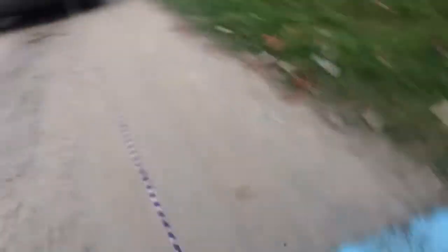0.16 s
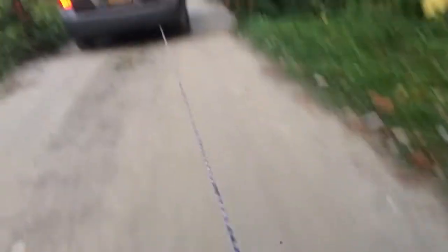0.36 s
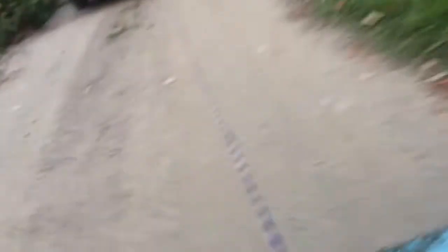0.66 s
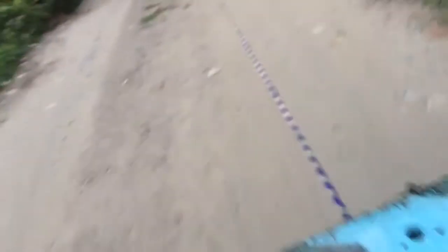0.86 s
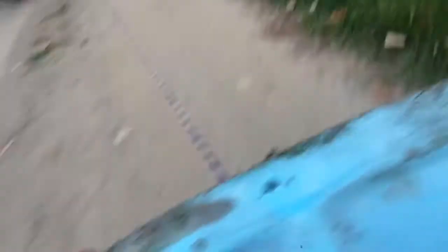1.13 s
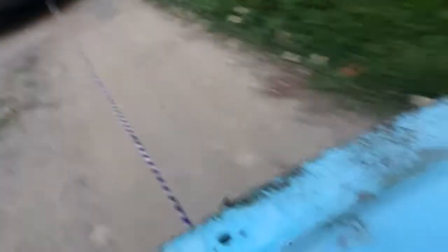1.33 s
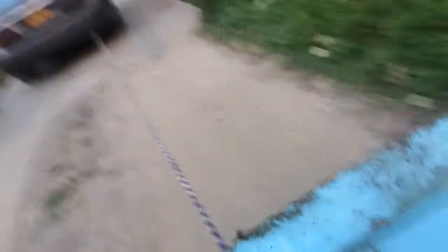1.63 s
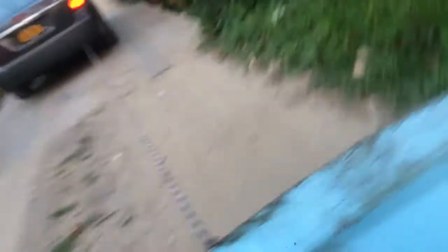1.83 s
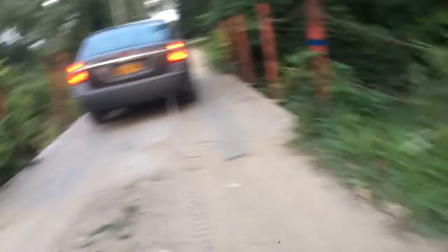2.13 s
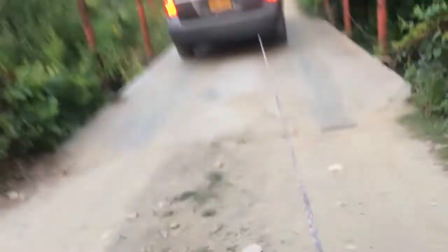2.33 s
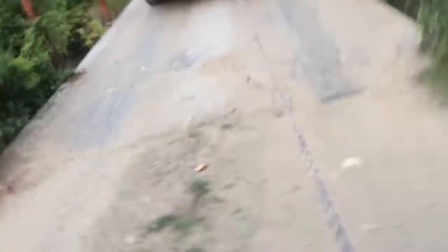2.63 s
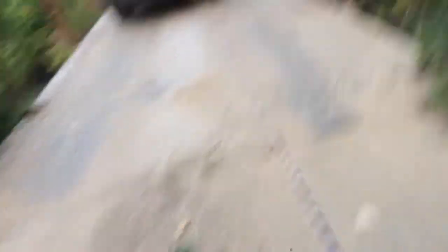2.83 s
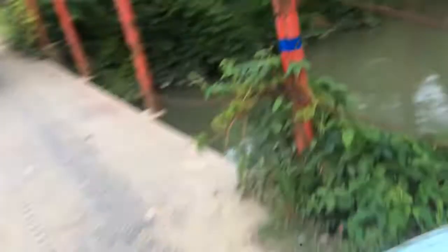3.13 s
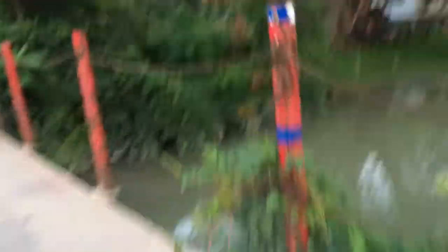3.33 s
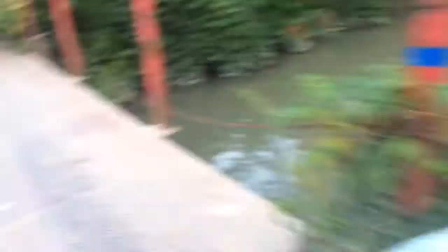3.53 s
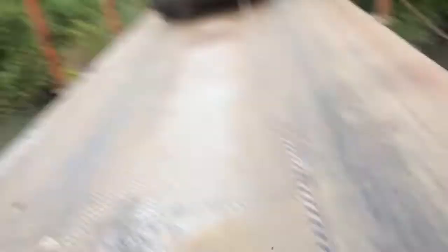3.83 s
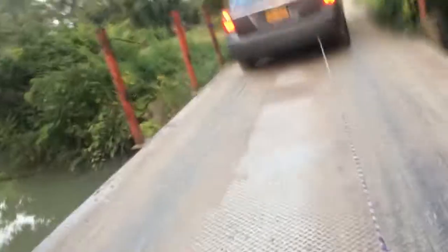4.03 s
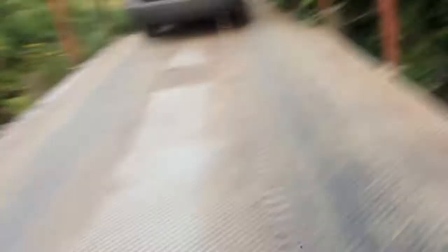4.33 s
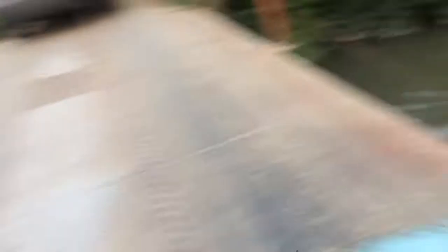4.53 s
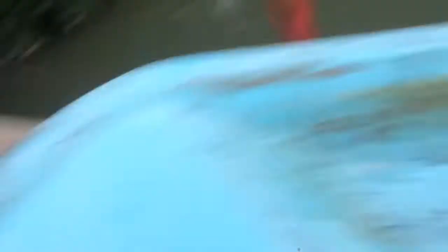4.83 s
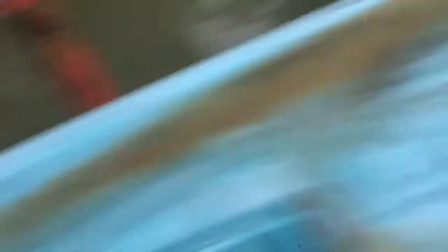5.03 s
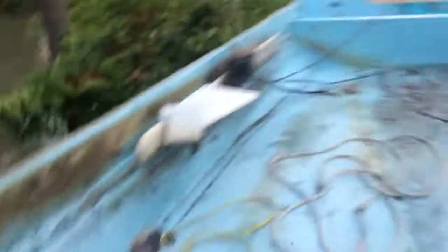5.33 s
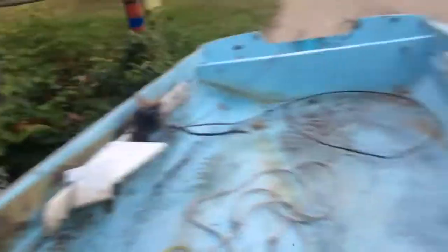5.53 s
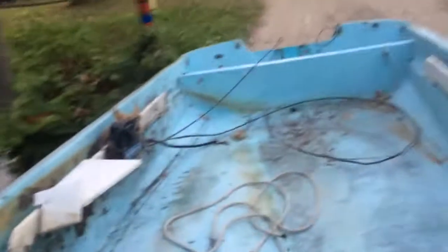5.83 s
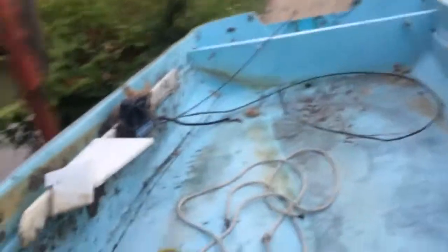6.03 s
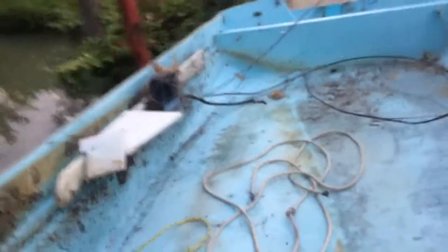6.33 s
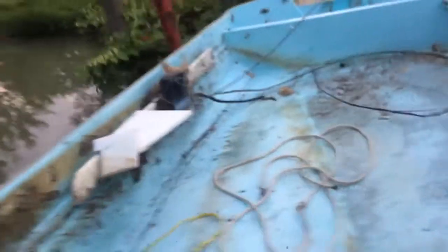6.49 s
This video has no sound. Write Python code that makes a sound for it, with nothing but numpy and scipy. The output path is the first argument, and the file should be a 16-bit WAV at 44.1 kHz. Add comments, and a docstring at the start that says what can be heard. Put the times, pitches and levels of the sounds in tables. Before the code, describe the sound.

Heard from on board, a fibreglass boat is dragged over a dirt road. The hollow hull drums and thuds at low pitch over bumps, while gravel grinds in short uneven strokes and a loose fitting rattles now and then. As it moves onto a steel-decked bridge outdoors, the scraping becomes harsher and brighter, with hard stone knocks, clattering taps and brief squeaks, then eases at the end. The microphone is close, inside the hull.

```python
"""A dirt road and then a steel-decked bridge, heard from on board a fibreglass boat towed on a rope.
Random contacts ring the bottom panel, hull and shell modes; bumps add sine thuds and drumming.
The keel digs in by strokes and skips over ridges, filtered grains hiss as grit, and a loose fitting rattles in runs.
On the deck the scrape turns harsher, with brief squeaks, and the bottom panel drones more."""
import sys
import numpy as np
from scipy import signal
from scipy.fft import rfft, irfft, next_fast_len
from scipy.io import wavfile
from scipy.ndimage import uniform_filter1d, minimum_filter1d, map_coordinates

SR = 44100
rng = np.random.default_rng(int(sys.argv[2]) if len(sys.argv) > 2 else 0)


def digitize_waveform(pressure):
    """Quantize a signal to 16-bit integers and store it at the path in sys.argv[1].

    Rows of a 2-D input are taken as channels; values are limited to [-1, 1].
    """
    field = np.atleast_2d(pressure).T
    bounded = np.clip(field, -1, 1)
    quanta = np.round(bounded * 32767).astype(np.int16)
    wavfile.write(sys.argv[1], SR, quanta)


N = 293703
TIME = np.arange(N) / SR


def from_db(db):
    """Amplitude gain of a level in dB."""
    return 10 ** (np.asarray(db) / 20)


def rms_one(x):
    """Scale to an RMS of 1."""
    return x / np.sqrt(np.mean(x ** 2) + 1e-20)


def in_time(rows):
    """Each dB column of a curve as a gain per sample."""
    s, *columns = np.transpose(rows)
    return [from_db(np.interp(TIME, s, db)) for db in columns]


def drift(rate_per_s):
    """Smooth chance with spread 1."""
    knots = rng.standard_normal(4000)
    return rms_one(map_coordinates(knots, [TIME * rate_per_s], order=1, mode="wrap"))


def bandpass(x, order, low_hz, high_hz):
    """Butterworth band."""
    return signal.sosfilt(signal.butter(order, [low_hz, high_hz], "band", fs=SR, output="sos"), x)


def colour(x, spectrum, skirt_db_per_octave=48):
    """Shape a signal by a spectrum whose ends fall away steeply."""
    hz, db = np.transpose(spectrum)
    size = next_fast_len(N + 8192)
    octave = np.log2(np.arange(size // 2 + 1) * SR / size + 1)  # +1 Hz avoids log of zero
    points = np.log2(hz)
    beyond = np.abs(octave - np.clip(octave, points[0], points[-1]))
    gain = from_db(np.interp(octave, points, db) - skirt_db_per_octave * beyond)
    return irfft(rfft(x, size) * gain, size)[:N]


def resonate(x, hz, width_hz):
    """A two-pole resonance with gain 1 on top."""
    radius = np.exp(-np.pi * width_hz / SR)
    zeros = np.array([1, 0, -1]) * (1 - radius ** 2) / 2
    poles = [1, -2 * radius * np.cos(2 * np.pi * hz / SR), radius ** 2]
    return signal.lfilter(zeros, poles, x + 1e-18)


def even(x, span_s):
    """Hold the slow level at 1 and keep the fast flutter."""
    size = max(int(span_s * SR), 8)
    power = uniform_filter1d(uniform_filter1d(x * x, size), size)
    return x / np.sqrt(np.abs(power) + 1e-14)


def grains(per_s, spread_db, clump_db, clumps_per_s):
    """Random contacts of uneven size that come in clumps."""
    sizes = from_db(spread_db * np.minimum(rng.exponential(1, N), 4)) * rng.choice([-1, 1], N)
    hits = rng.random(N) < per_s / SR
    return sizes * hits * from_db(clump_db * drift(clumps_per_s))


def add(out, s, sound):
    """Mix a short sound in at time s."""
    start = max(int(s * SR), 0)
    out[start:start + len(sound)] += sound[:max(N - start, 0)]


def bursts(times, levels_db, t60_s):
    """An envelope that jumps at each event and dies away by 60 dB in t60_s."""
    out = np.zeros(N)
    for s, db in zip(times, levels_db):
        add(out, s, from_db(db - 60 * TIME[:SR // 4] / t60_s))
    return out


def swell(s, half_s):
    """A Gaussian hump of height 1 at time s, down to 1/e after half_s."""
    return np.exp(-np.minimum(((TIME - s) / half_s) ** 2, 50))


# Passage onto the bridge. Each row: time in seconds, share of the keel on the deck 0-1.
DECK_SHARE = [(0, 0.21), (2.9, 0.15), (3.3, 0.48), (4.0, 0.24), (4.5, .55), (4.95, 0.83), (6.66, 0.94)]


def on_deck():
    """Share of the keel that rests on steel, per sample."""
    return np.clip(np.interp(TIME, *np.transpose(DECK_SHARE)), 0, 1)


# Skips over ridges. Each row: centre in seconds, change of gain in dB.
SKIPS = [(0.03, -3), (0.23, -2), (0.75, 0.5), (0.894, -3), (1.16, -3), (1.45, -1), (1.84, -1.5),
         (2.35, -0.5), (3.12, -5), (3.215, -3.5), (4.03, -1.5), (4.29, -7.5), (4.59, -2.5), (4.79, -0.5),
         (5.76, -2.5), (5.915, -0.5), (6.6, -2)]
SKIP_HALF_S = 0.041


def grounded():
    """Ground contact gain: nearly every skip dips it as the hull loses contact."""
    return from_db(sum(db * swell(s, SKIP_HALF_S) for s, db in SKIPS))


# Weight on the bottom panel. Each row: time in seconds, drone level in dB.
WEIGHT = [(0.0, -26), (1.93, -28), (2.21, -29), (4.84, -30), (4.95, -26.5), (6.19, -24.5), (6.34, -22.5),
          (6.66, -28)]
# Boat rocking down onto its bottom. Each row: centre in seconds, drone level in relative dB.
ROCKS = [(0.17, -19.5), (0.588, -18.5), (0.83, -20.5), (1.07, -25), (2.28, -21), (2.821, -21), (3.3, -20),
         (3.71, -20), (4.162, -20), (5.16, -18.5), (5.27, -24), (5.47, -18), (5.59, -15.5), (5.8, -22.5),
         (5.999, -16.5), (6.2, -14.5), (6.399, -21)]
# Heave spectrum. Each row: frequency in Hz, gain in dB.
HEAVE_SPECTRUM = [(18, -22.5), (28, -16.5), (42, 4.5), (60, 2), (80, 12), (110, -31)]
ROCK_HALF_S = 0.04
BOTTOM_HZ, BOTTOM_WIDTH_HZ, BOTTOM_SKIRT_HZ = 103, 10.8, 89


def bottom(deck, rock_db=-0.5, heave_db=-7.5, steel_heave_db=-0.5, heave_follows=0.9, uneven_db=3.15):
    """The wide bottom panel resonates under the weight, more at each rock; low heave noise follows its level."""
    steady = in_time(WEIGHT)[0] * from_db(uneven_db * drift(7.4))
    rocking = sum(from_db(db + rock_db) * swell(s, ROCK_HALF_S) for s, db in ROCKS)
    drone = np.hypot(steady, rocking)
    followed = drone.mean() * (drone / drone.mean()) ** heave_follows
    heave = followed * from_db(heave_db + steel_heave_db * deck)
    panel = resonate(grains(900, 3.9, 0.67, 9.3), BOTTOM_HZ, BOTTOM_WIDTH_HZ)
    panel = resonate(panel, BOTTOM_HZ, BOTTOM_SKIRT_HZ)
    sway = colour(rng.standard_normal(N), HEAVE_SPECTRUM)
    return drone * even(panel, 0.09) + heave * even(sway, 0.051)


# Steady shaking between bumps. Each row: time in seconds, level in relative dB.
SHAKE = [(0.0, -14.5), (0.52, -15), (1.22, -13.5), (1.35, -24), (1.61, -14.5), (1.76, -17), (2.5, -13.5),
         (3.1, -18), (3.99, -14.5), (4.38, -16.5), (5.08, -24.5), (5.25, -27.5), (5.99, -25), (6.21, -24.5),
         (6.44, -29.5), (6.66, -27)]
DRUM_RISE_S = 0.019  # drumming peaks this long after a bump
# The bearing point picks the pitch that booms most; it sinks along the road and wanders.
BEARING_HZ, BEARING_SAG_HZ_PER_S, WANDER_OCTAVES, WANDERS_PER_S = 207.5, 2, 0.091, 14


def shaking(steady_db=0.5, uneven_db=0.07, uneven_per_s=20):
    """Level and pitch of the drumming: each bump raises it and pulls it towards its own pitch."""
    power = (in_time(SHAKE)[0] * from_db(steady_db + uneven_db * drift(uneven_per_s))) ** 2
    bearing_hz = (BEARING_HZ - BEARING_SAG_HZ_PER_S * TIME) * 2 ** (WANDER_OCTAVES * drift(WANDERS_PER_S))
    weighted_hz = power * bearing_hz
    age = TIME[:SR // 3] / DRUM_RISE_S
    for s, _, hz, drum_db in BUMPS:
        surge = (from_db(drum_db) * age * np.exp(1 - age)) ** 2
        add(power, s, surge)
        add(weighted_hz, s, surge * hz)
    return np.sqrt(power) * grounded(), weighted_hz / power


def thud(hz, rise_s=0.0011, fall_s=0.013):
    """One soft blow on the hull: a decaying sine, peak 1."""
    t = TIME[:SR // 6]
    swing = np.sin(2 * np.pi * hz * t) * (1 - np.exp(-t / rise_s)) * np.exp(-t / fall_s)
    return swing / np.abs(swing).max()


# Hull modes. Each row: frequency in Hz, width in Hz, gain on dirt in dB, gain on the deck in dB.
HULL_MODES = [(135.7, 18, 0, -4), (165, 21.4, -3.5, -4.5), (199.3, 21.2, -6, -9), (238, 27, -9, -11.5),
              (263.6, 23, -1, -14), (312.7, 19, -12, -14.5)]
# Bumps. Each row: time in seconds, thud in relative dB, pitch in Hz, drumming after it in dB.
BUMPS = [(0.109, -17, 172, -11), (0.199, -7.5, 179, -8.5), (0.351, -22, 185, -7.5), (0.521, -3, 186, -24),
         (0.645, 8.5, 264, -19), (0.81, -9, 195, -9), (0.93, -19, 217, -10), (1.053, -4, 225, -12),
         (1.188, -22, 195, -20), (1.313, -12, 227, -4.5), (1.532, 1.5, 168, -26), (1.656, 0, 201, -11.5),
         (1.777, -16, 204, -16.5), (1.884, -1, 240, -15.5), (1.929, -10, 205, -9.5),
         (2.047, -13, 163, -9.5), (2.21, -10, 175, -13.5), (2.482, -19, 173, -8), (2.649, -3, 227, -15),
         (2.792, -12, 205, -18), (2.908, 0, 125, -13), (3.248, 2.5, 169, -25), (3.311, -16, 185, -16.5),
         (3.421, -1, 200, -25), (3.528, -14, 212, -16), (3.615, -4, 164, -14), (3.951, -6, 180, -11),
         (4.098, 2, 225, -15), (4.327, 3.5, 141, -9.5), (4.511, 2, 181, -13.5), (4.63, 3, 157, -14.5),
         (4.676, 9.5, 150, -14), (4.917, 0, 165, -29), (4.996, 4, 164, -13.5), (5.161, 2, 138, -20),
         (5.617, 1.5, 195, -29), (5.645, 3, 167, -27), (5.844, 0.5, 165, -16), (6.0, -14, 160, -22.5),
         (6.081, -17, 160, -20)]


def hull(deck, focus_db=8.0, reach_octaves=0.19, bump_db=-10.5):
    """Rough ground drums on hull modes, on dirt mostly near the bearing pitch; single bumps thud on top."""
    shake, pitch_hz = shaking()
    boom = 0
    for hz, width_hz, dirt_db, deck_db in HULL_MODES:
        nearness = np.exp(-(np.log2(hz / pitch_hz) / reach_octaves) ** 2) * (1 - deck ** 4)
        gain = from_db(dirt_db + deck * (deck_db - dirt_db) + focus_db * nearness)
        boom = boom + gain * resonate(grains(900, 2.9, 2.37, 45), hz, width_hz)
    out = even(bandpass(boom, 3, 100, 330), 0.052) * shake
    for s, db, hz, _ in BUMPS:
        add(out, s, from_db(db + bump_db) * thud(hz))
    return out


# Rattle runs. Each row: start in seconds, number of taps, gap between taps in seconds,
# loudest tap counted from 0 (may fall between taps), level there in dB.
RATTLES = [(0.5541, 1, .033, 0, -35), (1.1088, 3, .0322, 0.3, -20.5), (1.256, 2, 0.054, 0, -23.5),
           (1.37, 1, .033, 0, -32), (1.4492, 2, 0.029, 0.5, -27), (1.5928, 4, 0.033, 1.1, -19.5),
           (1.7382, 3, .036, 0.3, -29), (2.2544, 1, .033, 0, -36.5), (3.1777, 1, .033, 0, -42),
           (4.795, 2, 0.033, 0.4, -25.5), (5.013, 2, 0.024, 0, -20), (5.1968, 4, 0.03, 0.5, -11),
           (5.33, 3, 0.034, 1.15, -13.5), (5.518, 2, .061, 0, -17.5), (5.6925, 1, 0.03, 0, -30),
           (5.8925, 1, .033, 0, -30), (6.1712, 1, .033, 0, -13.5), (6.534, 1, .033, 0, -32),
           (6.5929, 2, 0.04, 1, -34)]
TAP_LOSS_DB = 6  # per tap before or after the loudest


def taps():
    """The fitting bounces in short runs: (s, dB) of each tap, weaker away from the loudest."""
    return [(s + k * gap_s, db - abs(k - loudest) * TAP_LOSS_DB)
            for s, count, gap_s, loudest, db in RATTLES
            for k in range(int(round(count)))]


# Fitting modes. Each row: frequency in Hz, width in Hz, gain on dirt in dB, gain on the deck in dB.
FITTING_MODES = [(1000, 58, -14, 11), (1970, 115, -1.5, 4.5), (2770, 330, 9, -9.5), (3210, 330, 9.5, -5.5),
                 (3640, 270, 11.5, -8.5), (6070, 660, -2.5, -24), (9000, 4200, -21.5, -33)]


def fitting(deck, chatter_db=-19.0, chatter_s=0.0045, mode_spread_db=2):
    """Each tap is a sharp contact and brief chatter through resonances; on deck more body, less edge."""
    out, t = np.zeros(N), TIME[:SR // 25]
    for s, db in taps():
        chatter = rng.standard_normal(len(t)) * np.exp(-t / chatter_s)
        contact = (t == 0) + from_db(chatter_db) * chatter
        steel = deck[int(s * SR)]
        tap = 0
        for k, (hz, width_hz, dirt_db, deck_db) in enumerate(FITTING_MODES):
            strength = from_db(dirt_db + steel * (deck_db - dirt_db) + rng.normal(0, mode_spread_db))
            tap = tap + (-1) ** k * strength * resonate(contact, hz, width_hz)
        add(out, s, from_db(db) * tap / np.abs(tap).max())
    return out


def mount(knock_db=0.5, click_db=-14.0, contact_s=0.0016):
    """Each tap of the fitting also clicks on its mount and knocks through the shell, as noise bursts."""
    s, db = np.transpose(taps())
    contacts = bursts(s, db, contact_s * np.log(1000)) * rng.standard_normal(N)
    knock = bandpass(contacts, 2, 700, 2200)
    click = bandpass(contacts, 1, 2500, 8000)
    return from_db(knock_db) * knock + from_db(click_db) * click


def slips(rows, wobble, wobbles_per_s):
    """Stick-slip friction: short gliding tones with an unsteady pitch."""
    out, unsteady = np.zeros(N), drift(wobbles_per_s)
    for s, start_hz, end_hz, length_s, db in rows:
        along = np.linspace(0, 1, max(int(length_s * SR), 8))
        wander = wobble * np.roll(unsteady, -int(s * SR))[:len(along)]
        hz = (start_hz + (end_hz - start_hz) * along) * (1 + wander)
        envelope = np.sqrt(2 * np.abs(np.sin(np.pi * along)))
        add(out, s, from_db(db) * envelope * np.sin(2 * np.pi * np.cumsum(hz) / SR))
    return out


# Groans. Each row: start in seconds, start pitch in Hz, end pitch in Hz, length in seconds, level in dB.
GROANS = [(3.80, 236.6, 173, 0.17, -11.5), (6.18, 100.3, 166.6, 0.187, -14.5),
          (6.30, 107.7, 103, .17, -11.5)]


def groans():
    """The hull sticks and slips at a low pitch."""
    return slips(GROANS, wobble=0.024, wobbles_per_s=70)


# Squeaks. Each row: start in seconds, start pitch in Hz, end pitch in Hz, length in seconds, level in dB.
SQUEAKS = [(5.9335, 10300, 10400, 0.014, -19.5), (5.952, 10300, 12800, 0.018, -23),
           (5.969, 11200, 12400, 0.021, -32), (6.183, 11000, 11500, .008, -32),
           (6.206, 11100, 12400, .009, -29)]


def squeaks():
    """Grit sticks and slips on steel at a high, rough pitch."""
    return slips(SQUEAKS, wobble=0.11, wobbles_per_s=8000)


# Rasps. Each row: start in seconds, start pitch in Hz, end pitch in Hz, length in seconds, level in dB.
RASPS = [(2.204, 1330, 1394, 0.018, -24), (5.078, 1060, 1000, 0.07, -17.5), (5.10, 1500, 1480, 0.047, -16),
         (6.11, 1564, 1632, 0.094, -24.5), (6.235, 1560, 1457, 0.095, -22.5), (6.26, 900, 880, 0.027, -19),
         (6.30, 1380, 1080, 0.062, -25)]


def rasps():
    """The shell sings briefly where it rubs hard."""
    return slips(RASPS, wobble=0.1, wobbles_per_s=600)


# Keel strokes. Each row: start in seconds, length in seconds, then the levels of grinding,
# grit hiss and side panels in relative dB.
SCRAPES = [(0.078, 0.054, -37, -65, -30), (0.268, 0.14, -20.5, -50.5, -26), (0.43, 0.084, -24, -51, -18),
           (0.597, 0.076, -28.5, -68, -18), (0.777, 0.062, -20.5, -45.5, -23.5),
           (0.903, 0.22, -22, -48.5, -22), (1.169, 0.039, -20.5, -44.5, -22),
           (1.297, 0.048, -22.5, -46, -28), (1.366, 0.029, -35, -51, -28), (1.565, 0.16, -26, -55, -32),
           (1.896, 0.082, -23.5, -50.5, -29), (2.032, 0.14, -26.5, -46.5, -32),
           (2.192, 0.047, -27.5, -55, -43), (2.272, 0.03, -27.5, -68, -18), (2.434, 0.16, -26.5, -53, -21),
           (2.688, .04, -26.5, -52, -27), (2.778, .16, -27.5, -50, -26), (3.305, .13, -25.5, -50.5, -30),
           (3.677, 0.11, -34, -78, -22), (3.764, 0.25, -30, -64, -24), (4.083, 0.059, -25.5, -51, -19),
           (4.208, 0.11, -28.5, -49.5, -27.5), (4.327, 0.044, -29.5, -65, -21.5),
           (4.411, 0.09, -32, -69, -22), (4.502, 0.054, -20, -40, -28), (4.623, .07, -29, -65, -24),
           (4.91, 0.044, -21.5, -43, -25), (4.969, 0.076, -19, -41, -28), (5.074, 0.077, -17, -36.5, -22.5),
           (5.287, 0.061, -22, -44, -42), (5.436, 0.023, -24, -30, -23.5), (5.51, 0.097, -31, -59, -47),
           (5.611, 0.017, -22, -43, -23), (5.925, 0.11, -24.5, -35.5, -40), (6.054, 0.021, -30, -33, -18.5),
           (6.153, 0.065, -22, -29, -20.5), (6.229, 0.095, -17.5, -32, -27)]
DIRT_ATTACK_S, STEEL_ATTACK_S = 0.035, 0.023
SCRAPE_RELEASE_S, SCRAPE_SAG_DB_PER_S = 0.035, 19.5


def strokes(deck):
    """Each stroke bites, sags while it lasts and lets go: gains of grinding, grit and side panels."""
    out, t = np.zeros((3, N)), TIME[:SR // 2]
    for s, length_s, *levels_db in SCRAPES:
        attack_s = DIRT_ATTACK_S + deck[int(s * SR)] * (STEEL_ATTACK_S - DIRT_ATTACK_S)
        bite = np.minimum(t / attack_s, 1)
        sag = from_db(-SCRAPE_SAG_DB_PER_S * t)
        release = np.exp(-np.maximum(t - length_s, 0) / SCRAPE_RELEASE_S)
        for layer, db in zip(out, levels_db):
            add(layer, s - attack_s / 4, from_db(db) * bite * sag * release)
    return out


# Steady keel contact. Each row: time in seconds, grinding in relative dB, grit hiss in relative dB.
CONTACT = [(0.0, -27.5, -60), (0.3, -31.5, -66.5), (1.22, -32, -56), (1.69, -30.5, -59.5),
           (2.69, -31.5, -55.5), (3.24, -34, -58.5), (3.52, -28.5, -50), (3.89, -33, -55.5),
           (4.92, -29.5, -55), (5.15, -25.5, -48), (5.45, -22, -47.5), (5.69, -28.5, -48.5),
           (5.94, -27, -52.5), (6.16, -18.5, -41), (6.49, -30, -50), (6.66, -34, -57)]
# Steady drag on the side panels. Each row: time in seconds, level in relative dB.
SIDE_DRAG = [(0.0, -24.5), (0.43, -22), (1.59, -29), (2.67, -24), (3.11, -29), (3.91, -28), (4.73, -31.5),
             (5.12, -25.5), (5.82, -33), (6.19, -24), (6.42, -36), (6.66, -37)]
UNEVEN_DB, UNEVEN_PER_S = 1.0, 45


def friction(deck, grit_db=0.6, sides_db=-1.5):
    """Steady contact on uneven ground plus the strokes: gains of grinding, grit and side panels."""
    steady = np.array(in_time(CONTACT) + in_time(SIDE_DRAG)) * from_db([[0], [grit_db], [sides_db]])
    flutter = from_db(UNEVEN_DB * drift(UNEVEN_PER_S))
    return np.hypot(steady * flutter, strokes(deck)) * grounded()


def pebbles(grind, grit, per_s=110.0, knock_db=-11.0, tick_db=-11.0):
    """Single pebbles pop out of the grinding: a knock in the shell and a tick in the treble."""
    pops = (rng.random(N) < per_s / SR) * rng.uniform(-0.91, 1, N)
    knock = rms_one(bandpass(pops, 3, 550, 1750))
    tick = rms_one(bandpass(pops, 1, 3000, 7000))
    return grind * from_db(knock_db) * knock + grit * from_db(tick_db) * tick


# Stones caught under the keel. Each row: time in seconds, knock in relative dB, ring in Hz,
# treble crunch in relative dB, bite near 2.5 kHz in relative dB.
STONES = [(0.641, -15, 725, -65, -42), (1.204, -11, 1160, -48, -36), (1.776, -14, 740, -55, -42),
          (2.057, -8, 770, -46, -38), (2.204, -8.5, 1410, -67, -40), (3.392, -14, 766, -37, -24),
          (3.526, -15, 726, -39.5, -42), (3.889, -9.5, 1527, -48, -35), (4.529, -5, 1000, -41, -18.5),
          (4.628, -22, 1010, -53, -38), (4.832, -13.5, 690, -60, -32), (4.973, -15, 1060, -32, -39),
          (5.011, -2, 1430, -33, -25), (5.077, -2.5, 996, -40, -23), (5.096, -12, 1500, -32, -34),
          (5.178, -4.5, 936, -43, -34), (5.229, -6, 940, -45, -19), (5.262, -11, 970, -51, -36),
          (5.294, -9.5, 1290, -35, -40), (5.367, -5, 915, -40, -24.5), (5.44, -11, 1240, -27, -26),
          (5.514, -4, 720, -48, -19), (6.008, -4, 1220, -49, -31), (6.059, -11, 1450, -32, -24),
          (6.169, -6, 1200, -41, -30), (6.234, 0, 1155, -41, -34), (6.63, -14.5, 985, -54, -40)]
SKID_DB, SKID_S, RING_S = -10.0, 0.008, 0.006  # decay times to 1/e


def caught_stones(level_db=-4.0, bite_db=0.5, bite_s=0.0087):
    """A stone hits the shell, rings it at its own pitch, and bites as it skids."""
    out, t = np.zeros(N), TIME[:SR // 10]
    for s, db, hz, _, edge_db in STONES:
        skid = rng.standard_normal(len(t))
        crack = bandpass((t == 0) + from_db(SKID_DB) * skid * np.exp(-t / SKID_S), 3, 600, 1750)
        ring = np.sin(2 * np.pi * hz * t) * np.exp(-t / RING_S)
        knock = crack / np.abs(crack).max() + ring
        bite = bandpass(skid * np.exp(-t / bite_s), 2, 2050, 3100)
        add(out, s, from_db(db + level_db) * knock / np.abs(knock).max())
        add(out, s, from_db(edge_db + bite_db) * bite / np.abs(bite).max())
    return out


def lift(depth_db=-2.0, lift_s=0.029):
    """The keel rides up on each stone, so the grinding eases just before it drops again."""
    raised = np.zeros(N)
    rise = np.sqrt(np.linspace(0, 1, max(int(lift_s * SR), 8)))
    for s, *_ in STONES:
        add(raised, s - lift_s, rise)
    return from_db(depth_db * np.minimum(raised, 1))


# Modes of the thin shell. Each row: frequency in Hz, gain on dirt in dB, gain on the deck in dB.
SHELL_MODES = [(477, -10, -15.5), (539, -0.5, -1.5), (664, -1, 3), (770, 4.5, -5.5), (900, -2, 1.5),
               (985, 1, 4), (1096, 4.5, -3.5), (1220, -6, -1.5), (1341, -1, 3.5), (1480, -2, 1),
               (1607, -7.5, 3.5), (1735, -7.5, -5.5), (1890, -11, -6.5), (1997, -13, -24.5),
               (2706, -34.5, -25.5)]
# Broad grinding spectrum. Each row: frequency in Hz, gain in dB.
GRIND_SPECTRUM = [(550, -9), (720, -1), (980, 1.5), (1250, 0), (1600, -7), (1950, -12), (2500, -21),
                  (3300, -27.5), (4500, -32)]
# Gravel coarseness: stones per second, spread of sizes in dB, clumping in dB, clumps per second.
GRAVEL = (1500, 3.2, 1.9, 90)


def shell(deck, width_hz=46.0, patchy_db=4.0, broad_db=-0.5):
    """Stones grind on the shell; the contact wanders along the keel and favours now one mode, now another."""
    stones, modes = grains(*GRAVEL), 0
    for k, (hz, dirt_db, deck_db) in enumerate(SHELL_MODES):
        gain = from_db(dirt_db + deck * (deck_db - dirt_db) + patchy_db * drift(22))
        modes = modes + (-1) ** k * gain * resonate(stones, hz, width_hz)
    broad = colour(grains(3000, 1.12, 2.0, 90), GRIND_SPECTRUM)
    return even(rms_one(modes) + from_db(broad_db) * rms_one(broad), 0.11)


# Side panel spectrum. Each row: frequency in Hz, gain in dB.
PANEL_SPECTRUM = [(250, -1), (330, 2), (430, 4), (540, 0), (660, -5), (850, -20)]
# Grit spectrum on dirt. Each row: frequency in Hz, gain in dB.
GRIT_DIRT_SPECTRUM = [(1760, -32.5), (3000, 0.5), (4400, -9), (6960, -8), (8260, -12), (11000, -22.5),
                      (14000, -25.5), (15400, -41)]
# Grit spectrum on the deck. Each row: frequency in Hz, gain in dB.
GRIT_DECK_SPECTRUM = [(1760, -66), (3000, -3.5), (3730, 2.5), (4310, -0.5), (4810, 2), (10900, 1.5),
                      (14600, -11.5), (15400, -8)]
CRUNCH_T60_S = 0.055


def keel(deck, grind, grit, drag, grind_db=-1.5, grit_db=-1.0, crunch_db=2.5):
    """Stones grind through the shell, the side panels rumble, and fine grit hisses and crunches."""
    s, _, _, treble_db, _ = np.transpose(STONES)
    sand = grains(18000, 2.4, 2.3, 140)
    on_dirt = rms_one(colour(sand, GRIT_DIRT_SPECTRUM))
    on_steel = rms_one(colour(sand, GRIT_DECK_SPECTRUM))
    hiss = even((1 - deck) * on_dirt + deck * on_steel, 0.023)
    crunch = bursts(s, treble_db + crunch_db, CRUNCH_T60_S)
    hiss = hiss * np.hypot(grit * from_db(grit_db), crunch)
    sides = even(colour(grains(1100, 1.94, 2.0, 60), PANEL_SPECTRUM), 0.099) * drag
    return (sides + shell(deck) * grind * from_db(grind_db)) * lift() + hiss


def scene():
    """Sum of all layers, background first."""
    deck = on_deck()
    grind, grit, drag = friction(deck)
    body = bottom(deck) + hull(deck)
    rattle = fitting(deck) + mount()
    tones = groans() + squeaks() + rasps()
    scrape = pebbles(grind, grit) + caught_stones() + keel(deck, grind, grit, drag)
    return (body + rattle + tones + scrape)[None]


def record(dry, ceiling=0.81, cutoff_hz=15400):
    """A fast limiter ducks the loudest peaks, then the top is cut."""
    size = SR // 200
    needed = np.minimum(1, ceiling / (np.abs(dry) + 1e-9))
    gain = uniform_filter1d(uniform_filter1d(minimum_filter1d(needed, 2 * size), size), size)
    return signal.sosfilt(signal.ellip(10, .2, 80, cutoff_hz, fs=SR, output="sos"), dry * gain)


dry = scene()
out = record(dry)
digitize_waveform(out)
```